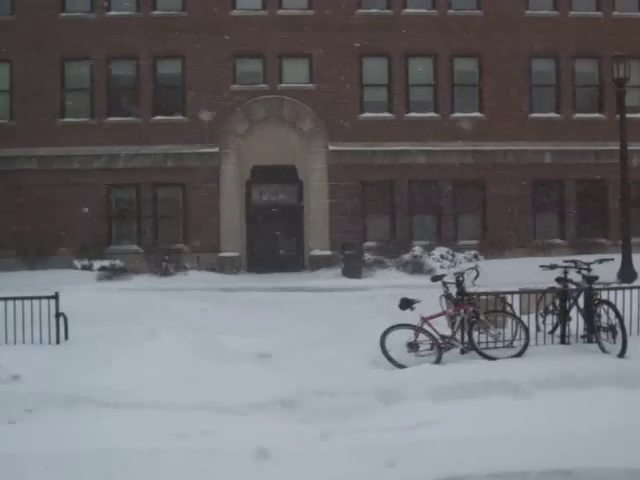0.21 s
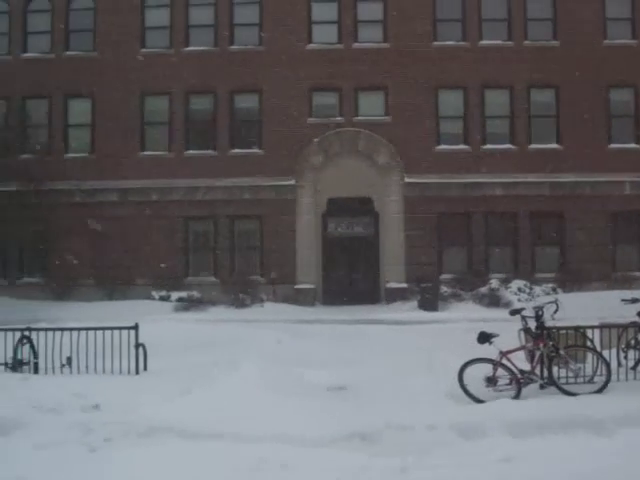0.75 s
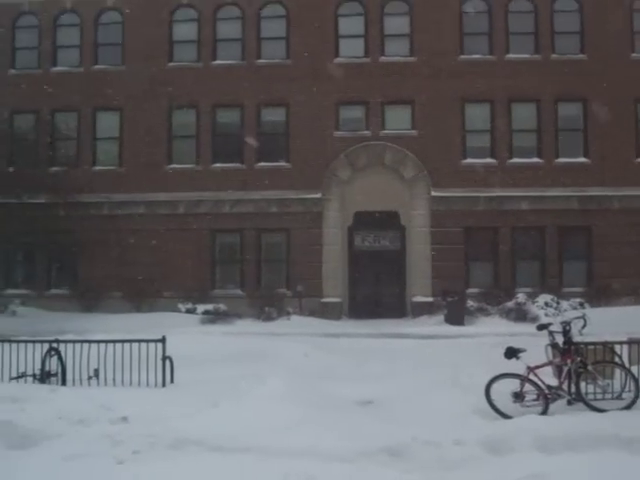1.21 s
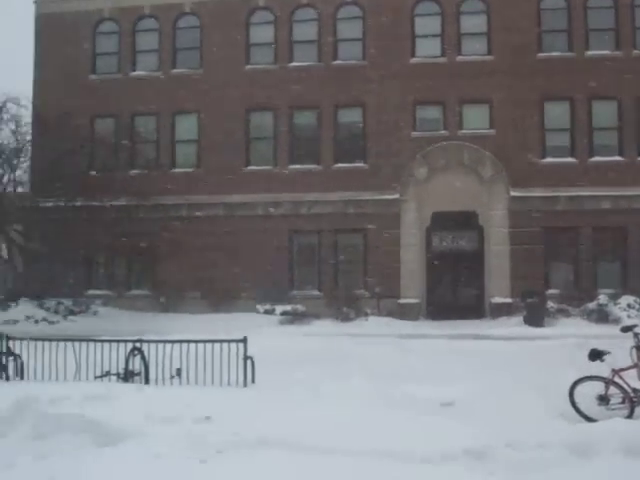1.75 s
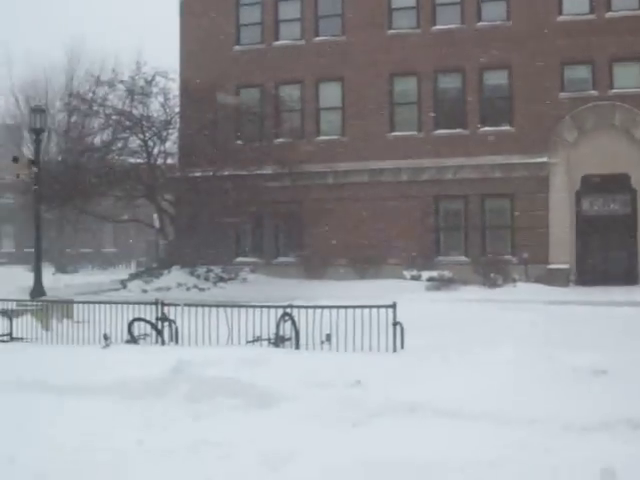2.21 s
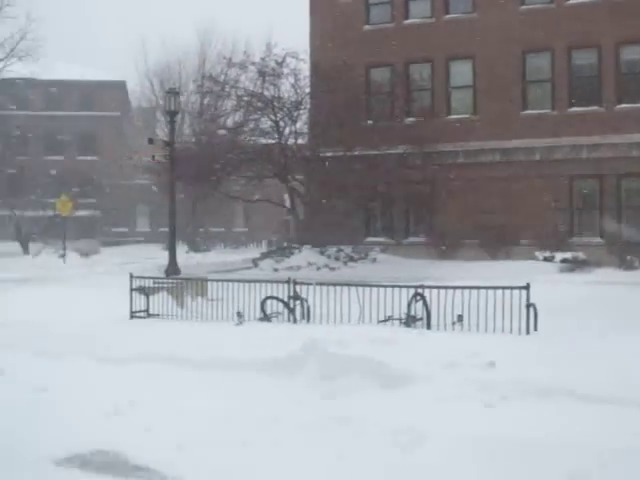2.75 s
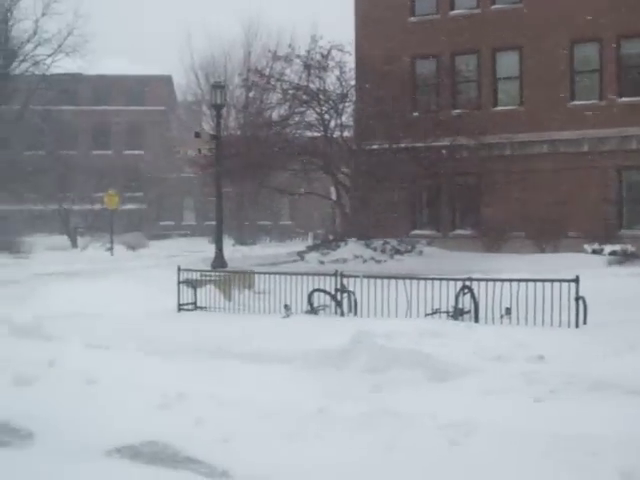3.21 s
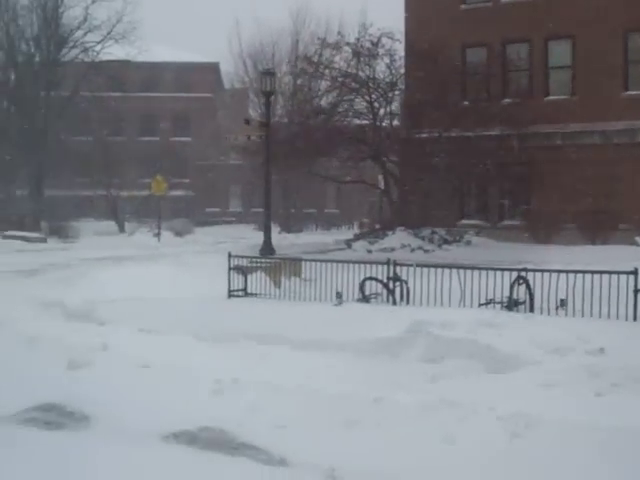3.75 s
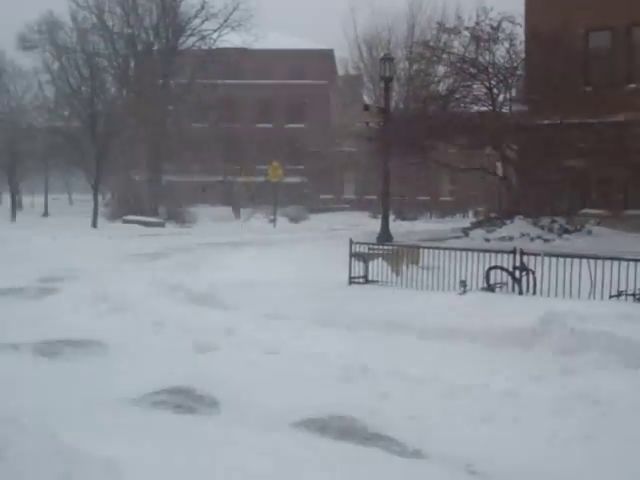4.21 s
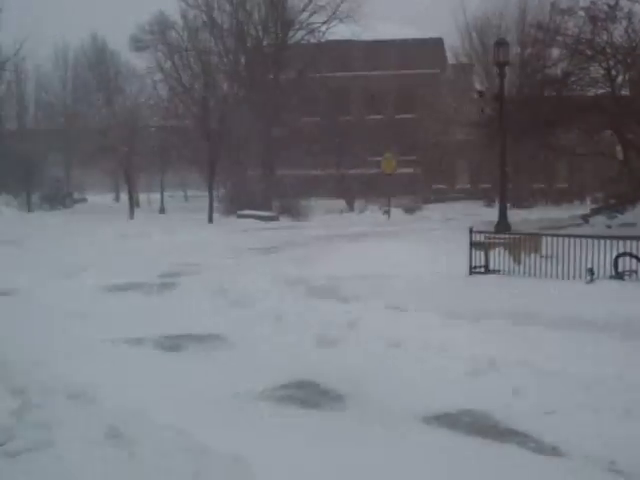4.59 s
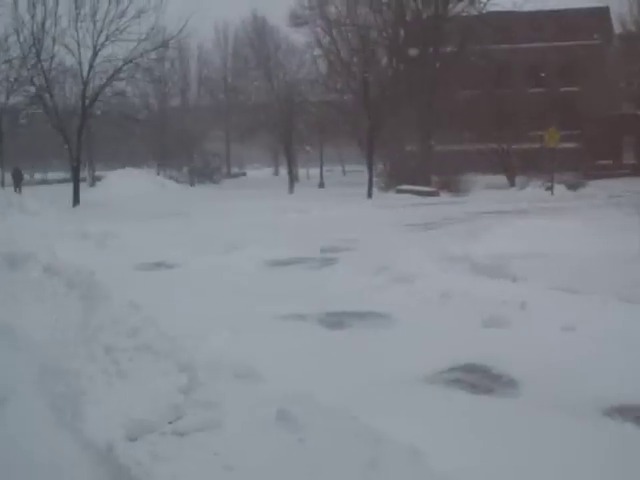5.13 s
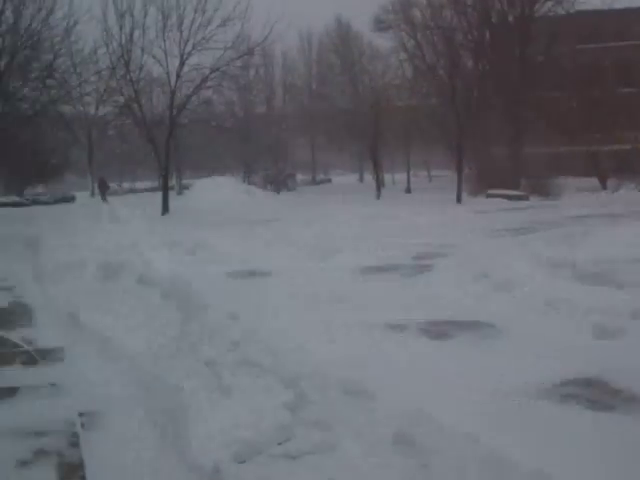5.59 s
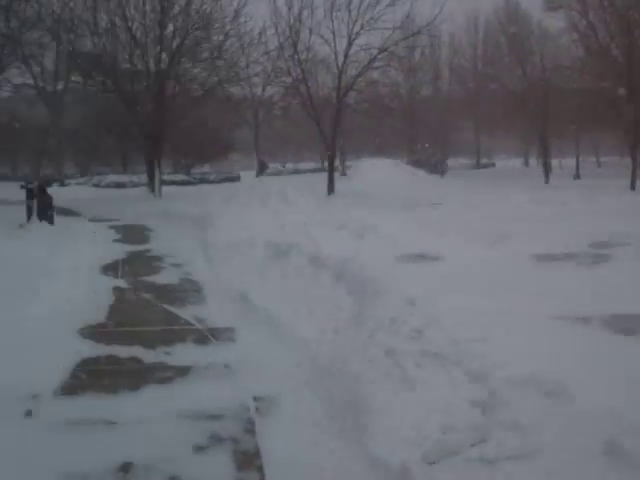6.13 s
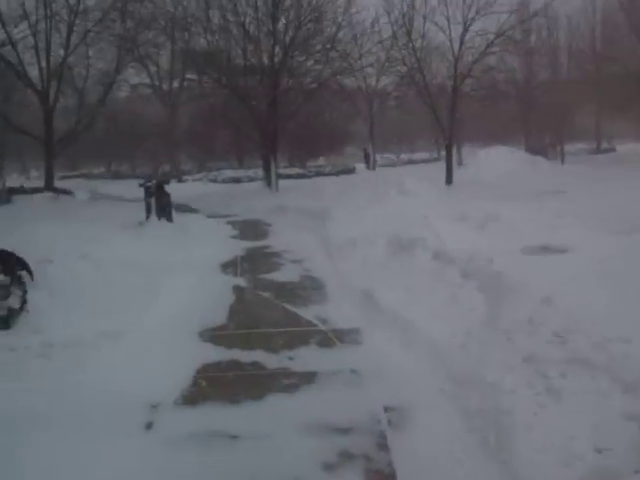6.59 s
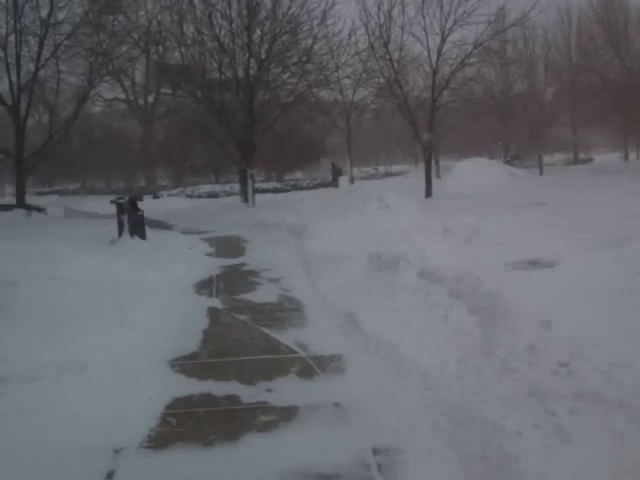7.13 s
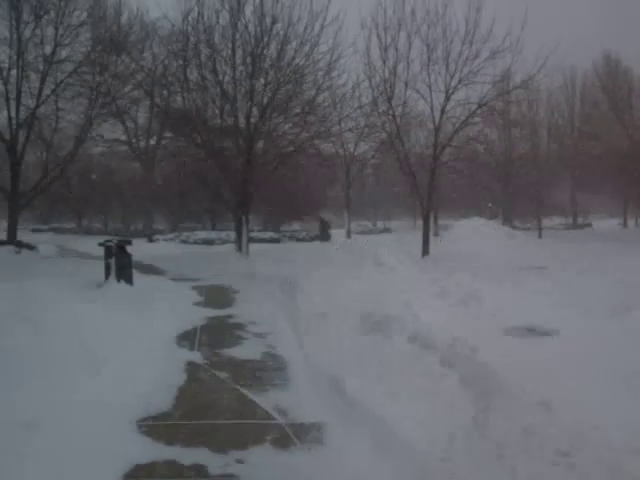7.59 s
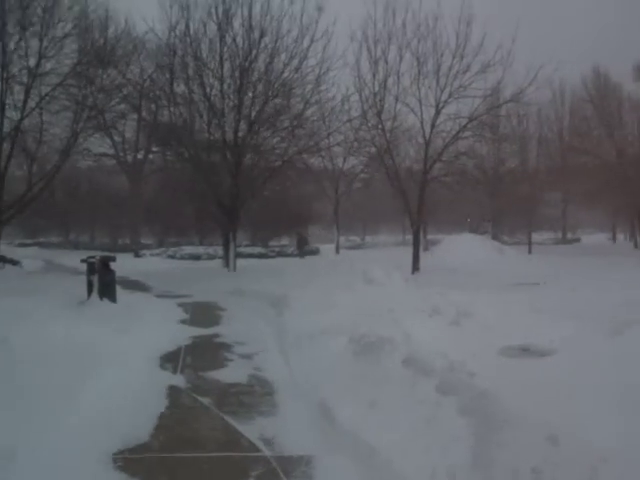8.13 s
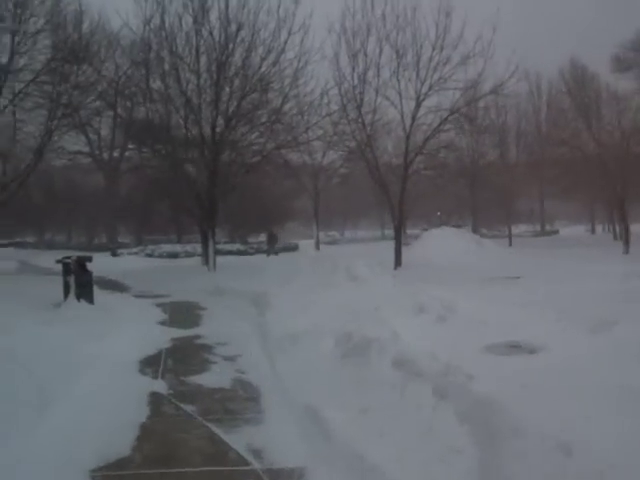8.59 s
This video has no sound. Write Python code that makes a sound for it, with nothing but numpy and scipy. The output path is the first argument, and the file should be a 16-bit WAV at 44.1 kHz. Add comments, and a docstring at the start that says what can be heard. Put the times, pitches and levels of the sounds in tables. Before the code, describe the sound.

A steady motor drone with a rapid chugging rattle sits within blowing wind. Early gusts are modest; a cluster of deep thumps hits at about three and a half seconds and a stronger one near five, briefly ducking everything else. Sparse ticks of snow turn into a busy patter with some loud cracks. The sound is close, mono and slightly muffled at the top, with short handling scratches late.

```python
"""Wind over a small camera microphone in a snowstorm: a steady breeze, with lumpy bass gusts and thumps.
A snow-clearing machine runs nearby from the start, at nearly steady speed: it drones, knocks, roars
and buzzes with each firing, duller or brighter as the camera turns. Faint high tones hold throughout.
Flakes tick on the case, sparse at first and dense later; late on, a glove rubs it a few times.
Gain control ducks everything around the loud gusts and impacts."""
import sys
import numpy as np
from scipy import signal
from scipy.io import wavfile
from scipy.ndimage import uniform_filter1d, map_coordinates

SR = 44100
rng = np.random.default_rng(int(sys.argv[2]) if len(sys.argv) > 2 else 0)


def generate_wav(sig):
    """Save sig (samples, or channels by samples) to the path in sys.argv[1] as 16-bit PCM at SR."""
    pcm = np.round(np.clip(np.atleast_2d(sig).T, -1, 1) * 32767).astype(np.int16)
    wavfile.write(sys.argv[1], SR, pcm)


N = 390726


def amp(db):
    """Amplitude ratio of a level in dB."""
    return 10 ** (np.asarray(db) / 20)


def evened(x):
    """Signal scaled to RMS 1."""
    return x / np.sqrt(np.mean(x ** 2) + 1e-20)


def read(points, hz):
    """Spectrum table interpolated over log frequency."""
    f, value = np.transpose(points)
    return np.interp(np.log(hz + 1), np.log(f + 1), value)


def columns(rows, t):
    """Each value column of a table interpolated over time."""
    s, *values = np.transpose(rows)
    return [np.interp(t, s, v) for v in values]


def add(mix, s, sound):
    """Mix a sound in at s seconds, cut at the end."""
    part = mix[round(s * SR):][:len(sound)]
    part += sound[:len(part)]


def ring(x, hz, width_hz):
    """Two-pole resonance of peak gain about 1."""
    pole = np.exp((2j * np.pi * hz - np.pi * width_hz) / SR)
    return 2 * signal.lfilter([1 - abs(pole)], [1, -pole], x).real


def grid(size):
    """Frame times (s) and bin frequencies (Hz) of short-time spectra."""
    frames_s = np.arange(4 * N // size + 5) * size / 4 / SR
    return frames_s, np.fft.rfftfreq(size, 1 / SR)


def noise(field_db, patchy_db, flicker_db):
    """Noise under a dB field (bins x frames), with patches and a flicker shared by all bins."""
    real, imag, patches = rng.standard_normal((*field_db.shape[::-1], 3)).T
    patches = uniform_filter1d(patches, size=5, axis=0)
    patches = evened(uniform_filter1d(patches, size=6, axis=1))
    flicker = evened(uniform_filter1d(rng.standard_normal(real.shape[1]), size=3))
    level_db = field_db + patchy_db * patches + flicker_db * flicker
    spectra = (real + 1j * imag) * amp(level_db)
    size = 2 * len(real) - 2
    return signal.istft(spectra, nperseg=size, noverlap=3 * size // 4)[1][:N]


def gusts(t):
    """Level and tilt of the wind: gusts rise fast, swell or sag, and break off over the breeze."""
    # steady wind: time_s, level_db
    breeze = [(0, -31), (.65, -29.5), (1.2, -35.5), (1.85, -29.5), (2.5, -33.5), (2.75, -27.5), (3.3, -32),
              (4.3, -28.5), (5.2, -25), (5.5, -25.5), (5.8, -30.5), (6.3, -28), (6.45, -23.5), (7.1, -24.5),
              (7.48, -30), (8.86, -24)]
    # gusts: start_s, length_s, starting_level_db, change_by_end_db, tilt_db_per_octave
    gust_rows = [(0.23, 0.27, -28, -8, 1.6), (0.696, 0.11, -21, -6, -1.5), (2.594, 0.11, -22.5, -6.5, 1),
                 (3.343, 0.67, -23, -7.5, 1), (4.003, 0.065, -21, -3, 1.5), (4.341, 0.075, -21, 0.5, -2),
                 (4.499, .12, -24.5, 7.5, 1.5), (4.727, 0.14, -12, -7, -1.2), (4.877, 0.088, -20, 6, 1.5),
                 (5.048, .16, -10, -3, 0), (5.272, 0.16, -14.5, 3.5, -0.5), (5.82, 0.091, -21, -5, 1),
                 (5.95, .1, -19, -0.5, -2.5), (6.092, 0.14, -20, -5.5, 1.2), (6.932, 0.076, -21, -0.5, 2.5),
                 (7.122, 0.2, -20.5, -7, -1), (7.512, 0.2, -19, -10.5, 1.3), (7.792, 0.17, -21.5, -7, 0),
                 (8.22, 0.14, -31, 3, -1), (8.43, 0.25, -22, -8, 0.5), (8.64, 0.33, -24, 3, 0)]
    breeze_tilt_db_per_octave = 2.5
    rise_s, fall_s = 0.036, 0.017
    power = amp(2 * columns(breeze, t)[0])
    tilted = breeze_tilt_db_per_octave * power
    for s, length_s, db, change_db, tilt_db in gust_rows:
        rise = (t - s) / rise_s
        fall = 1 + (s + length_s - t) / fall_s
        edges = np.clip(np.minimum(rise, fall), 0, 1)
        level_db = db + change_db * np.clip((t - s) / length_s, 0, 2)
        gust_power = (edges ** 2 * amp(level_db)) ** 2
        power = power + gust_power
        tilted = tilted + tilt_db * gust_power
    return np.sqrt(power), tilted / power  # tilt weighted by power


def wind():
    """Eddies on the microphone port: lumpy bass whose brightness changes from gust to gust."""
    # spectrum before tilt: freq_hz, relative_db_per_hz
    buffet = [(8.8, -60.5), (15, -11), (49, 6), (150, 2), (268, -5.5), (776, -13), (893, -13.5),
              (1050, -22.5), (1630, -29.5), (1800, -33), (2340, -51.5), (3960, -120)]
    frames_s, hz = grid(size=512)
    octaves = np.log2((hz[:, None] + 70) / 300)
    field_db = read(buffet, hz)[:, None] + octaves * gusts(frames_s)[1]
    lumps = noise(field_db, patchy_db=2.5, flicker_db=2.5)
    lumps /= np.sqrt(uniform_filter1d(lumps ** 2, size=8000) + 1e-20)  # leave the level to the gusts
    return gusts(np.arange(N) / SR)[0] * lumps


def shaking(t):
    """How far the rattle of the loose panels stands above the hiss, dB."""
    # swells: middle_s, half_length_s, added_rattle_db
    swells = [(0.995, 0.17, 6), (2.482, 0.28, 8), (4.5, .5, 4), (5.708, 0.43, 7.5), (6.998, 0.45, 1.5),
              (8.8, .12, 4)]
    rest_db = 1.5
    return rest_db + sum(db * np.exp(-((t - s) / half_s) ** 2) for s, half_s, db in swells)


def machine():
    """Each firing knocks the casing, shakes loose panels and gates a roar; the snow sends a late copy."""
    # speed: time_s, firings_per_s
    speed = [(0.0, 44.82), (1.3, 45.84), (2.7, 45.84), (3.2, 45.5), (3.7, 44.68), (4.3, 45.47),
             (5.7, 45.56), (6.2, 46.36), (6.8, 46.48), (7.4, 46.38), (8.0, 45.77), (8.86, 45.79)]
    # as the turning camera hears it: time_s, knock_db, clatter_db, hiss_db, drone_db
    heard = [(0.0, -44, -40.5, -50.5, -31), (0.7, -40, -37, -47, -36.5), (1.1, -36.5, -37.5, -47, -35),
             (1.7, -37.5, -36.5, -46, -36.5), (2.5, -36, -30.5, -42, -35.5), (3.1, -35, -31, -39.5, -34),
             (3.87, -33, -25.5, -39, -29), (4.56, -33.5, -30.5, -40.5, -29),
             (4.9, -39.5, -31.5, -43.5, -34), (5.7, -39, -29.5, -43, -28), (6.5, -47.5, -37, -42.5, -32.5),
             (7.0, -43, -41, -46.5, -31), (7.9, -46.5, -33, -42, -34.5), (8.3, -47, -36, -44, -31.5),
             (8.86, -40, -33.5, -39.5, -40)]
    # three firings in turn: relative_knock_db, relative_roar_db
    pattern = [(0, -3), (-7, 0.5), (-.3, 0)]
    # casing rings: freq_hz, width_hz, relative_db
    casing = [(928.4, 49, 2), (832, 40, -10), (962, 28, -11), (998, 10, -14.5), (2276, 53, -11.5),
              (2540, 62, -17.5), (2076, 120, -15), (1420, 440, -16)]
    # centres of knock, clatter, rattle, hiss: freq_hz
    layers_hz = (900, 2200, 4600, 7200)
    # roar spectrum: freq_hz, relative_db_per_hz
    roar_spectrum = [(180, -36.5), (300, -18), (740, -15), (928, 0), (996, -20), (1200, -23), (1420, -21),
                     (1800, -14), (2260, -12), (2560, -13.5), (2870, -18.5), (3860, -20.5), (7180, -18.5),
                     (8150, -24.5), (8750, -44), (11400, -82), (19200, -120)]
    # loose sheet that buzzes: freq_hz, width_hz, relative_db
    panels = [(4940, 580, 2), (3950, 320, 3)]
    # ground echo: time_s, delay_ms
    bounce = [(0, 1.08), (1.2, 1.11), (4.0, 1.6), (8.86, 1.8)]
    buzz_over_hiss_db, buzz_db_per_rattle_db = -6.5, 1.22
    drone_waver_db, waver_s = 1, 0.048

    t = np.arange(N) / SR
    turns = .02 + np.cumsum(columns(speed, t)[0]) / SR  # firings so far
    firing, phase = turns.astype(int), turns % 1
    scatter_db = 0.4 * rng.standard_normal((firing[-1] + 1, 2))
    blow, puff = amp(np.array(pattern)[firing % len(pattern)] + scatter_db[firing]).T
    knock_db, clatter_db, hiss_db, drone_db = columns(heard, t)

    kicks = np.diff(firing, prepend=0) * blow
    # a broad first ring gives the soft swell of a heavy casing
    modes = np.array([amp(db) * evened(ring(ring(kicks, hz, 260), hz, width_hz))
                      for hz, width_hz, db in casing])
    deep = np.transpose(casing)[0] < 1200
    clatter = np.roll(modes[~deep].sum(axis=0), round(.007 * SR))  # valves follow the firing
    knocks = amp(knock_db) * modes[deep].sum(axis=0) + amp(clatter_db) * clatter

    frames_s, hz = grid(size=512)
    knock, clat, hiss, _ = columns(heard, frames_s)
    levels_db = np.array([knock, clat, hiss + shaking(frames_s), hiss])
    # each bin follows the layers nearest in pitch
    layers = np.arange(len(levels_db))
    place = np.interp(np.log(hz + 1), np.log(layers_hz), layers)
    shares = np.maximum(1 - abs(place[:, None] - layers), 0)
    change_db = levels_db - levels_db.mean(axis=1, keepdims=True)
    roar_db = read(roar_spectrum, hz)[:, None] + shares @ change_db
    roar = noise(roar_db, patchy_db=1.22, flicker_db=1.5)
    gate = 0.66 + puff * np.exp(-phase / 0.27) * np.minimum(phase / 0.13, 1)

    firing_scatter = amp(3.3 * rng.standard_normal(firing[-1] + 1)[firing])
    shake = rng.standard_normal(N) * (gate - .4) * firing_scatter
    sheet = evened(sum(amp(db) * ring(shake, hz, width_hz) for hz, width_hz, db in panels))
    # the buzz stands out when the camera faces the panels
    buzz = amp(hiss_db + buzz_over_hiss_db + buzz_db_per_rattle_db * shaking(t)) * sheet

    direct = knocks + buzz + amp(-32.0) * evened(roar * gate)
    delay = columns(bounce, t)[0] * SR / 1000
    late = map_coordinates(direct, [np.arange(N) - delay], order=3)
    # the snow returns only the middle of the sound
    soft = signal.filtfilt(*signal.butter(1, (1000, 3300), "band", fs=SR), late)

    span = max(round(waver_s * SR), 1)
    waver = uniform_filter1d(rng.standard_normal(N), span)
    waver = evened(uniform_filter1d(waver, span))  # gusty air on the way
    drone_level = amp(drone_db + drone_waver_db * waver) * np.sqrt(2)
    drone = drone_level * np.cos(4 * np.pi * turns + 2.4)  # two cycles a firing
    return direct + .45 * soft + drone


def whine():
    """Thin steady high sines, probably the camera's own electronics."""
    # tones: freq_hz, rms_db
    tones = [(7852, -60), (7882, -60), (8118, -63), (8148, -64)]
    t = np.arange(N) / SR
    return sum(amp(db) * np.sqrt(2) * np.sin(2 * np.pi * (hz * t + rng.random())) for hz, db in tones)


def thumps():
    """Single eddies slap the port: a sudden pressure drop, a slower rebound; harder slaps are quicker."""
    # slaps: start_s, strength_db
    slaps = [(0.0577, -11.5), (0.4663, -9), (2.6343, -11), (3.3833, 3), (3.4629, -0.5), (3.593, -4),
             (3.8028, -10), (4.6079, 3), (4.7553, 7.5), (4.8369, 2), (4.9437, -2), (4.9666, -4),
             (5.0776, -1), (5.122, 13), (5.1309, -11), (5.1971, -3), (5.3462, 3.5), (5.3899, 7.5),
             (5.9923, -13), (7.0015, -8), (7.3913, -7), (8.4523, -6)]
    cycle_ms_at_0_db, quickening_ms_per_db = 4.65, .15
    out = np.zeros(N)
    for s, db in slaps:
        ms = max(cycle_ms_at_0_db - quickening_ms_per_db * db, 1)
        cycles = np.arange(0, 2, 1000 / (ms * SR))
        front = np.minimum(cycles * ms / 1.07, 1)  # takes about a millisecond
        fade = np.exp(-cycles / 0.63) * (1 - cycles / 2)
        add(out, s, -amp(db) * front * np.cos(2 * np.pi * cycles) * fade)
    return out


def tick(hz, t60_s, row):
    """A crack of a few milliseconds: a decaying noise burst through two broad resonances, peak 1."""
    t = np.arange(len(row)) / SR
    burst = row * amp(-60 * t / max(t60_s, .002))
    crack = ring(ring(burst, hz, .9 * hz), hz, .9 * hz)
    crack *= np.minimum(t / 0.00055, 1)
    return crack / abs(crack).max()


def flakes():
    """Hard flakes crack on the case: large ones at set times, small ones at random."""
    # large flakes: start_s, peak_db, centre_hz
    large = [(0.8455, -18.5, 6100), (1.135, -16, 5450), (2.3296, -20, 4940), (4.713, -9, 6430),
             (4.7905, -12, 5760), (5.041, -17, 5270), (5.149, -2, 7260), (5.255, -11.5, 5670),
             (5.271, -11.5, 6000), (5.5837, -14, 3950), (5.717, -12.5, 4010), (5.8267, -14.5, 5160),
             (6.1696, -11, 6300), (6.1966, -15.5, 6360), (6.221, -16, 7290), (6.236, -20, 4800),
             (6.256, -18, 6600), (6.2988, -7, 6040), (6.3476, -13.5, 6500), (6.4958, -10, 6770),
             (6.6266, -18, 5600), (6.685, 5, 6340), (6.741, -11, 4300), (6.7869, 1, 3320),
             (6.9427, -12.5, 6000), (7.0007, -16.5, 5550), (7.016, -16, 4600), (7.0388, -19, 5490),
             (7.1407, -16, 6600), (7.182, -16, 5920), (7.371, -9, 6900), (7.42, -8, 5970),
             (7.574, -7.5, 6030), (7.7256, -10, 7340), (7.9204, -15, 6460), (8.006, 0, 4740),
             (8.086, -13.5, 6050), (8.23, -14.5, 3640), (8.2606, -13, 7500), (8.3457, -12.5, 7330),
             (8.3998, -16, 5600), (8.4737, -9.5, 7800), (8.5404, -12, 5900), (8.5717, 6, 4520),
             (8.635, -10, 6150)]
    # small flakes: time_s, ticks_per_s
    flurry = [(0, 4.9), (4.5, 14), (6, 39), (6.3, 80), (8.86, 98)]
    out = np.zeros(N)
    for (s, db, hz), row in zip(large, rng.standard_normal((len(large), 1024))):
        add(out, s, amp(db) * tick(hz, 0.0081, row))
    rate = columns(flurry, np.arange(N) / SR)[0]
    size_db = -27.0 + 3.26 * np.minimum(rng.exponential(1, N), 3.0)
    hits = amp(size_db) * (rng.random(N) < rate / SR)
    kind = rng.integers(0, 16, N)
    for k, hz in enumerate(np.geomspace(4000, 8400, num=16)):
        small = tick(hz, 0.0031, rng.standard_normal(512))
        out += signal.oaconvolve(hits * (kind == k), small)[:N]
    return out


def rubs():
    """A glove on the case: short scratchy slips, resonant noise of fast uneven level."""
    # rubs: start_s, length_s, level_before_fades_db, centre_hz
    slides = [(7.211, 0.0087, -28.5, 2000), (8.174, 0.047, -27, 1200), (8.224, .005, -31, 2220),
              (8.531, 0.0089, -25, 1480), (8.747, 0.066, -28, 5000)]
    out = np.zeros(N)
    for (s, length_s, db, hz), row in zip(slides, rng.standard_normal((len(slides), 2, 8192))):
        slips = amp(5.2 * evened(uniform_filter1d(row[1], size=100)))
        n = min(int(length_s * SR), 8192)
        scratch = evened(ring(row[0] * slips, hz, 0.4 * hz)[:n])
        add(out, s, amp(db) * scratch * signal.windows.tukey(n, .4))
    return out


def scene():
    """All sources at the microphone, one channel."""
    return (wind() + thumps() + machine() + flakes() + rubs() + whine())[None]


def record(dry):
    """Microphone low cut, gain control with slow recovery, input overload, then the band limit."""
    low_cut_hz, droop_hz, edge_hz = 22, 8200, 8700
    threshold_db, recovery_db_per_s, duck_db_per_db = -15, 48.0, 0.66
    dry = signal.sosfilt(signal.butter(2, low_cut_hz, "high", fs=SR, output="sos"), dry)
    power_db = 10 * np.log10(abs(uniform_filter1d(dry[0] ** 2, size=600)) + 1e-12)
    fall_db = np.arange(N) * recovery_db_per_s / SR
    held_db = np.maximum.accumulate(power_db + fall_db) - fall_db  # peaks, sinking at the recovery rate
    over_db = np.maximum(held_db - threshold_db, 0)
    ducked = dry / amp(duck_db_per_db * uniform_filter1d(over_db, size=300))
    ducked = .8 * np.tanh(ducked / .8)  # the loudest ticks overload the input
    # microphone droops near the edge
    rolled = signal.sosfilt(signal.butter(3, droop_hz, fs=SR, output="sos"), ducked)
    band = signal.firwin(255, edge_hz, window=("kaiser", 9), fs=SR)
    return signal.oaconvolve(rolled, band[None], "same")


dry = scene()
out = record(dry)
generate_wav(out)
```